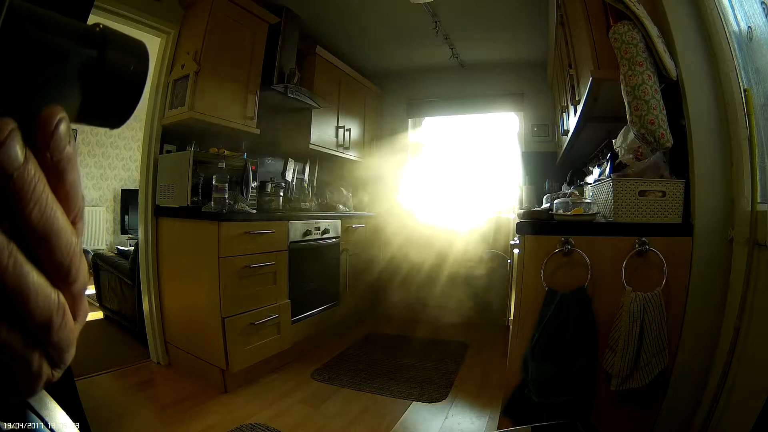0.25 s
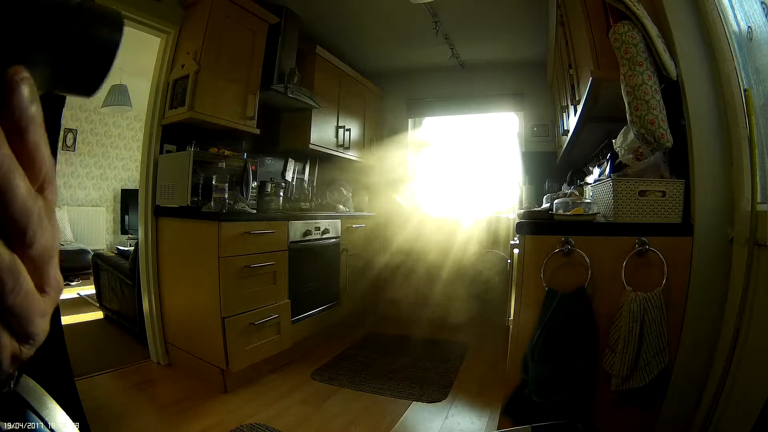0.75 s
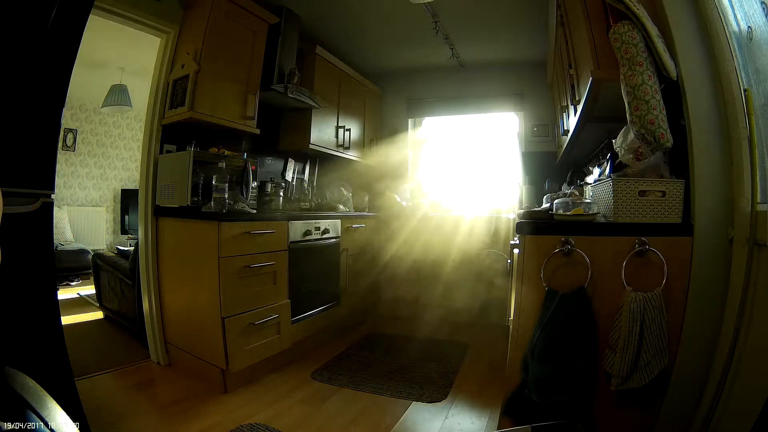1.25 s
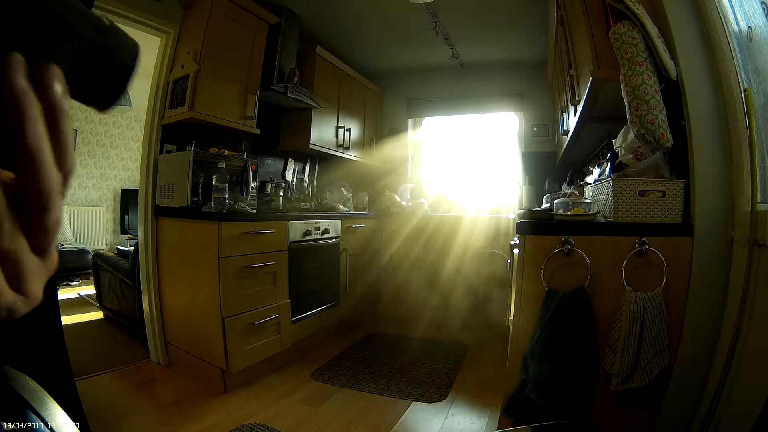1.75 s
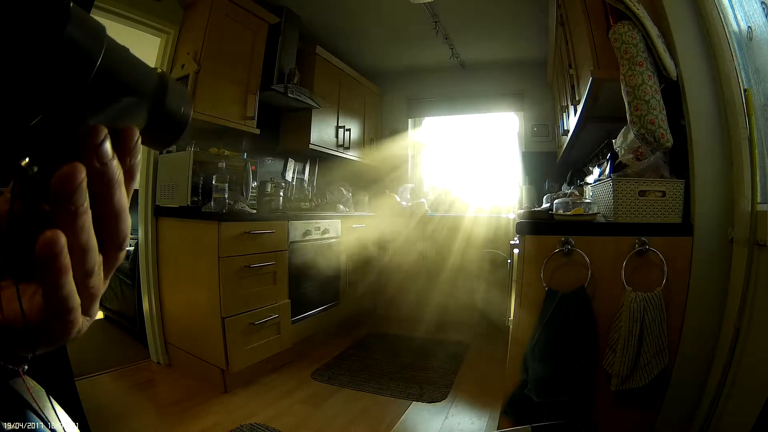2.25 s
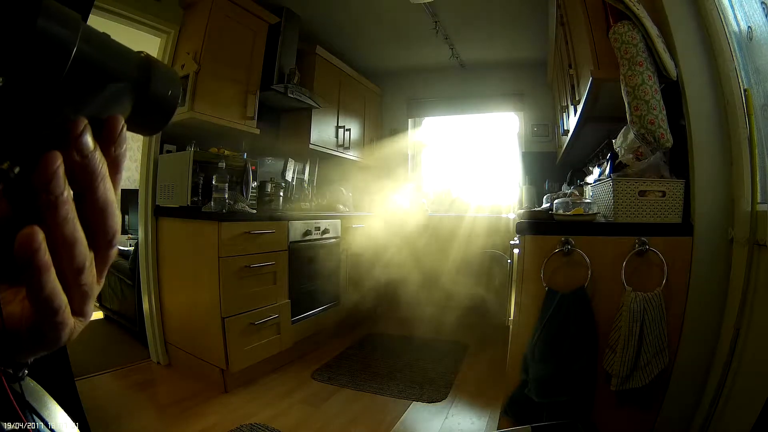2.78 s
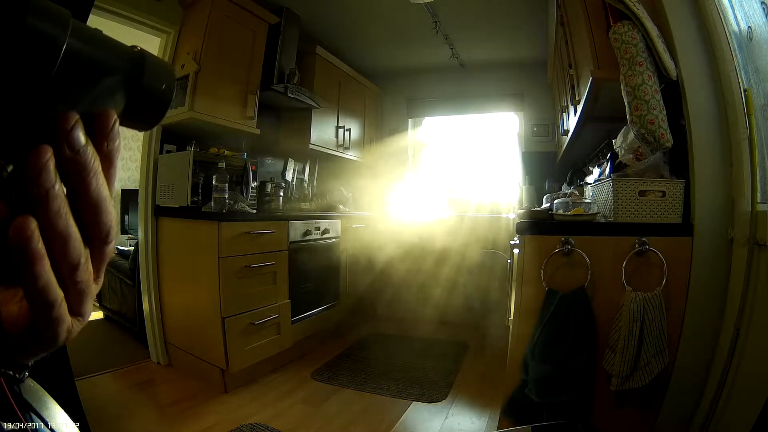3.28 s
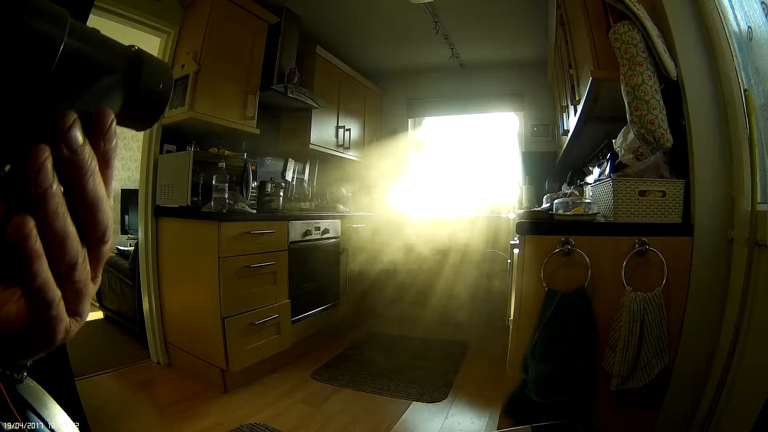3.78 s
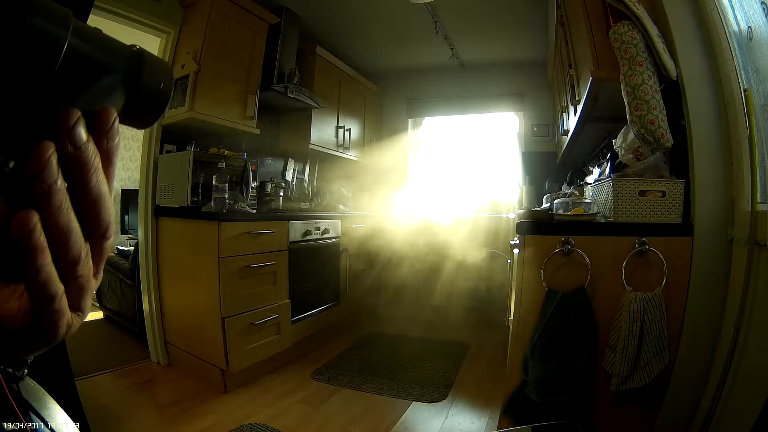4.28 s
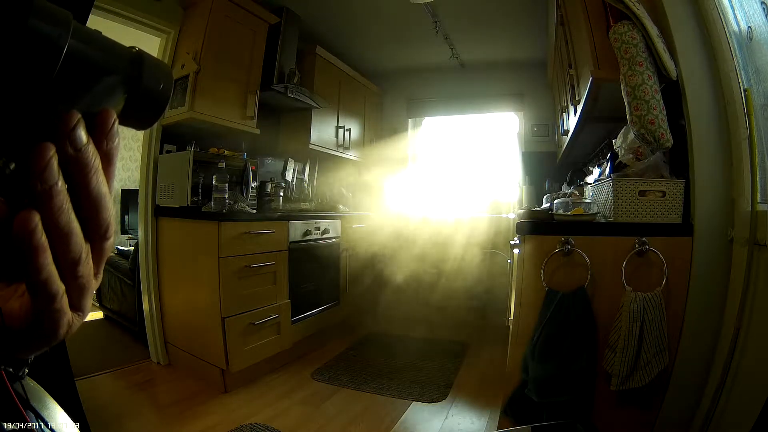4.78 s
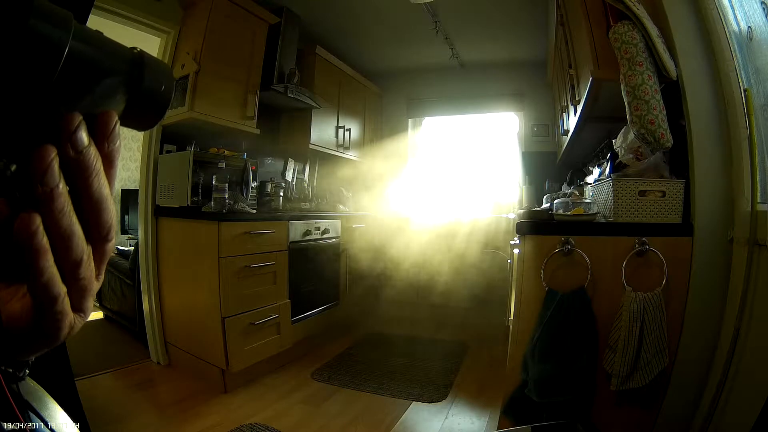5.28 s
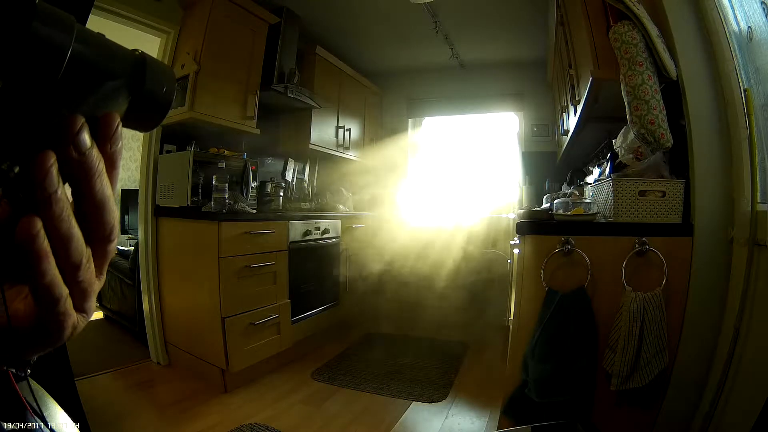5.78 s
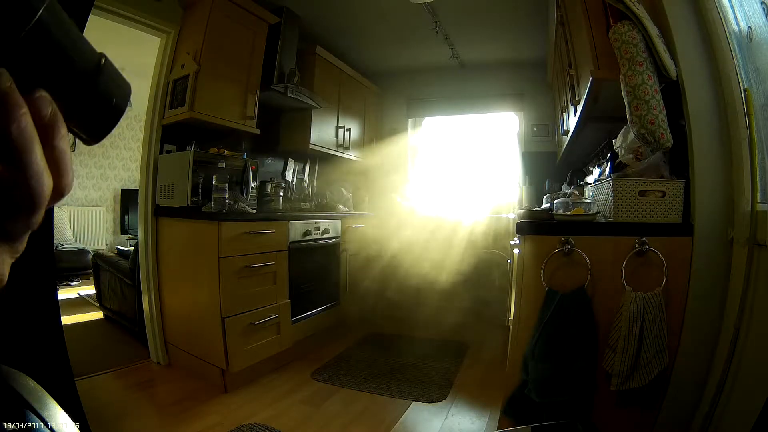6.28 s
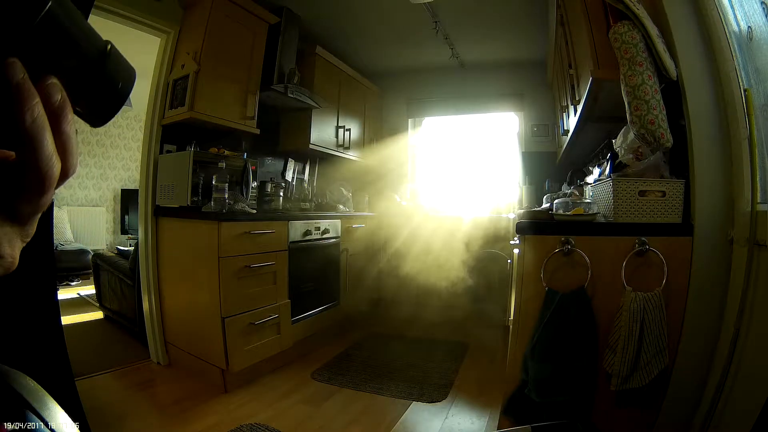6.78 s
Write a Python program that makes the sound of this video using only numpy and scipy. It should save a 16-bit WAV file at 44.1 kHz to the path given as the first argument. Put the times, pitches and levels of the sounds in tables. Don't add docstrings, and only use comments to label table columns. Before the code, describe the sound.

Close, steady hairdryer rush with a whirring motor tone, briefly dipping twice, then coasting down to near quiet, clicking, and surging back.

```python
import sys
import numpy as np
from scipy import signal
from scipy.fft import rfft, irfft, next_fast_len
from scipy.io import wavfile
from scipy.ndimage import uniform_filter1d, map_coordinates

SR = 44100
rng = np.random.default_rng(int(sys.argv[2]) if len(sys.argv) > 2 else 0)


def boost(x):
    u = np.asarray(x, float) / 20
    return 10 ** u


def put_to_file(sound):
    columns = np.atleast_2d(sound).T
    safe = np.clip(columns, -1, 1)
    whole_steps = np.round(safe * 32767)
    wavfile.write(sys.argv[1], SR, whole_steps.astype(np.int16))


N = 310464


def unit(x):
    return x / np.sqrt(np.mean(x ** 2) + 1e-20)


def along(points, hz):
    f, v = np.transpose(points)
    return np.interp(np.log(hz + 1), np.log(f + 1), v)


def curves(rows):
    s, *cols = np.transpose(rows)
    return [np.interp(np.arange(N) / SR, s, c) for c in cols]


def wobble(rate):
    knots = rng.standard_normal(int(N * rate / SR) + 4)
    return map_coordinates(knots, [np.arange(N) * rate / SR])


# (time [s], speed the motor pulls towards [Hz], 0 = off, spin-up time [s])
SWITCH = [
    (0, 291.3, .13),
    (1.35, 0, 0),
    (1.425, 275.9, .128),
    (3.62, 0, 0),
    (3.905, 291.6, .137),
    (5.29, 0, 0),
    (6.635, 240, .25),
    (6.8, 292, .25),
]


def shaft():
    creep_hz_per_s = .35
    braked_decay_s, free_decay_s, free_hz = .25, .35, 86
    out, hz = np.zeros(N), SWITCH[0][1]
    starts = [round(row[0] * SR) for row in SWITCH]
    for a, b, (_, top_hz, rise_s) in zip(starts, starts[1:] + [N], SWITCH):
        t = np.arange(b - a) / SR
        if top_hz:
            out[a:b] = top_hz + creep_hz_per_s * t - (top_hz - hz) * np.exp(-t / rise_s)
        else:
            braked_s = np.minimum(t, braked_decay_s * np.log(hz / free_hz))
            out[a:b] = hz * np.exp(-braked_s / braked_decay_s - (t - braked_s) / free_decay_s)
        hz = out[b - 1]
    return uniform_filter1d(out, size=700)


def powered():
    s, top_hz, _ = np.transpose(SWITCH)
    row = np.searchsorted(s, np.arange(N) / SR, "right") - 1
    return uniform_filter1d(1. * (top_hz[row] > 0), size=900)


# (time [s], level of the dryer's air and tones [dB], inlet facing the microphone [dB])
HAND = [(0, -1.5, -5), (.08, 0.1, 2), (.55, -1, -14), (.8, 1.2, -28), (1.3, 0.6, -45), (1.44, -1.3, 6),
        (1.58, 1.1, -1), (1.75, 1.5, 3.5), (1.95, 1.8, 2), (2.15, 0.7, 1), (2.9, 0.1, 0.5),
        (3.6, 0.84, 2.5), (4.0, 0.3, -2), (4.26, 3.5, 0), (4.6, 0.06, 3), (5.3, -0.44, 1), (6.8, 1.4, -1),
        (6.95, 2, -18)]


def by_speed(rows):
    speed_hz, *cols = np.transpose(rows)
    now = np.log(shaft())
    return np.array([np.interp(now, np.log(speed_hz), c) for c in cols]) + curves(HAND)[0]


# (time [s], share of the second aim [0-1])
TURN = [
    (0, 0.3),
    (1.2, 0),
    (1.9, 0.94),
    (7.04, 1),
]


def turned():
    return np.clip(curves(TURN)[0], 0, 1)


# (shaft [Hz], roar [dB], duct resonance [dB], hiss [dB], rumble [dB])
AIR_BY_SPEED = [(6, -70, -71, -65, -70), (21, -56, -61, -58, -56), (26.2, -49, -52, -54, -57),
                (46, -40.5, -44.5, -50, -55), (65, -42, -43.5, -48, -53), (90.6, -32.5, -36, -44, -48.5),
                (126, -27.5, -30.5, -37.5, -46), (164, -25.5, -24.5, -33.5, -44),
                (212, -23.5, -21.5, -28.5, -41), (297.4, -20.5, -16.5, -22, -38)]
# (roar [dB], duct resonance [dB], hiss [dB], rumble [dB])
FIRST_AIM_DB = (1.5, -1.5, -0.64, 6.5)


def flow():
    first = 1 - turned()
    levels_db = by_speed(AIR_BY_SPEED) + np.outer(FIRST_AIM_DB, first)
    levels_db[1] += 0.077 * first * curves(HAND)[1]
    return levels_db


# (frequency [Hz], width [Hz], lift [dB])
STANDING = [(608, 69, -1.5), (751.5, 30, 5), (1000, 17, 7), (1094, 49, 4), (1260, 26, 5.5),
            (1344, 13, 10.5), (1455, 47, 3), (1610, 35, -1), (1724, 21, 6.5), (1911, 17, 7.5),
            (2070, 14, 4), (2167, 15, 2), (4630, 82, 4.5), (5550, 140, 4), (7230, 110, 1.5)]


def rush(spectra, patchy_db, peaks=STANDING):
    z = signal.stft(rng.standard_normal(N + 512), nperseg=512)[2]
    field = uniform_filter1d(rng.standard_normal(z.shape), 5, 0)
    field = uniform_filter1d(field, 8, 1)
    noise = signal.istft(z * boost(patchy_db * unit(field)), nperseg=512)[1]
    m = next_fast_len(N + 8192)
    hz = np.fft.rfftfreq(m, 1 / SR)
    lift_db = sum(db / (1 + (2 * (hz - centre) / width) ** 2) for centre, width, db in peaks)
    lifted = rfft(noise, m) * boost(lift_db)
    return [unit(irfft(lifted * boost(along(s, hz)), m)[:N]) for s in spectra]


def aimed(spectra, patchy_db):
    first, second, coasting = rush(spectra, patchy_db)
    turn = turned()
    slow = np.clip((139 - shaft()) / 71.5, 0, 1)
    return (1 - slow) * ((1 - turn) * first + turn * second) + slow * coasting


# (frequency [Hz], density [dB per Hz])
ROAR = [
    [(210, -56), (350, -30), (371, -17.5), (474, -12.5), (610, 1.5), (764, -4.5), (895, -13), (1010, -5.5), (1120, 0.5), (1460, -5.5), (1700, -3), (2210, -23), (3740, -120)],
    [(210, -36), (350, -17), (386, -13.5), (487, -13), (556, -4.5), (665, -5), (744, -2.5), (889, -3.5), (1070, -1), (1550, -4), (1700, -10.5), (2210, -54), (3740, -120)],
    [(210, -39), (350, -9), (500, 0), (720, 7.5), (821, 1.5), (1140, 0), (1380, -3.5), (1700, -6), (2210, -42.5), (3740, -120)],
]
# (frequency [Hz], density [dB per Hz])
DUCT = [
    [(910, -26), (1550, 0), (1960, -0.5), (2350, -9.5), (2490, -10), (2670, -5.5), (2870, -11), (3190, -9), (3700, -43), (4810, -36), (8140, -120)],
    [(910, -63), (1550, -13), (1660, -9), (1880, -2), (1980, 0.5), (2320, -12.5), (2690, -10), (2900, -16), (3160, -14), (3700, -33), (4810, -56), (8140, -120)],
    [(910, -47), (1550, -19), (1810, -1), (2000, 2), (2270, -9), (2620, -8), (2900, -3), (3700, -30), (4810, -51), (8140, -120)],
]
# (frequency [Hz], density [dB per Hz])
HISS = [
    [(2000, -15), (3400, -2), (3780, -8.5), (4780, 0.5), (5250, -5), (5450, -2.5), (6380, -1), (7140, 3.5), (7800, -3), (8470, -1.5), (9970, -8), (11200, -14.5), (12400, -13), (13300, -21), (15300, -41)],
    [(2000, -20), (3400, -8), (3690, -6.5), (4350, -3.5), (4720, -0.5), (5090, -3.5), (5630, -3), (6420, -3.5), (6920, 3), (7190, 4.5), (7950, -3), (9370, -4.5), (10900, -15.5), (12300, -13), (15300, -37.5)],
    [(2000, -42), (3400, -12), (3880, -12), (4050, 1), (4300, -5), (4600, -11.5), (5800, -10), (6100, -9), (7060, -2), (9790, -15), (11700, -13), (12400, -16), (15300, -35)],
]
# (frequency [Hz], density [dB per Hz])
RUMBLE = [(15, -52), (25, -39), (92, -11.5), (220, -3.5), (274, -3), (325, -3.5), (450, 0), (580, -0.5),
          (990, -120)]


def air():
    roar_db, duct_db, hiss_db, rumble_db = flow()
    flutter = 0.35 * wobble(9) + 0.16 * wobble(40)
    roar = boost(roar_db + flutter + 0.12 * wobble(28)) * aimed(ROAR, patchy_db=0.9)
    duct = boost(duct_db + flutter + 0.47 * wobble(90)) * aimed(DUCT, patchy_db=0.03)
    hiss = boost(hiss_db + flutter + 0.15 * wobble(150)) * aimed(HISS, patchy_db=-1.36)
    rumble = boost(rumble_db - 2.5) * rush([RUMBLE], patchy_db=0.7)[0]
    return roar + duct + hiss + rumble


# (shaft [Hz], unbalance [dB], blade [dB], second blade [dB], third blade [dB])
TONES_BY_SPEED = [(22, -90, -88, -80, -75), (28.5, -83, -71, -54, -48), (42, -79, -57, -44, -62),
                  (60, -78, -41.5, -49, -65), (85, -78, -36.5, -48, -60), (112, -68, -41, -46, -58),
                  (150, -67, -47, -56, -54), (201, -60, -27, -58, -60), (243, -44.5, -27, -54, -54),
                  (264, -43.5, -28.5, -47, -34), (292, -42.5, -27.5, -44, -42.5)]
# (share of facing [dB per dB], ..)
BEAMING = (-0.06, 0.32, .3, 2.2)
# (level [dB], ..)
DRIVEN_DB = (0, 1.5, -27, .5)
# (shaft multiple, level under the hiss [dB])
BRUSHES = [(19, -31), (20, -31), (35, -29), (38, -31), (41, -31), (43, -31), (44, -32), (45, -30),
           (46, -32), (47, -32)]


def fan():
    shaft_hz, power = shaft(), powered()
    tones_db = by_speed(TONES_BY_SPEED) + np.outer(BEAMING, curves(HAND)[1]) + np.outer(DRIVEN_DB, power)
    angle = 2 * np.pi * np.cumsum(shaft_hz * (1 + 0.00034 * wobble(25.06))) / SR
    loading = .5 + shaft_hz / 580
    tones, whine = np.zeros(N), np.zeros(N)
    for k, db, shake_db in zip((1, 7, 14, 21), tones_db, (1.5, 2.8, 2.5, 1.5)):
        tones += np.sqrt(2) * boost(db + shake_db * loading * wobble(45)) * np.sin(k * angle)
    for k, db in BRUSHES:
        dull_db = np.maximum(k * shaft_hz - 12700, 0) / 70
        whine += boost(db + 1.4 * wobble(2.8) - dull_db) * np.sin(round(k) * angle + k * k)
    return tones + boost(flow()[2]) * power * whine


def motor_hum():
    t = np.arange(N) / SR
    near_db = np.interp(t, [0, 1.4, 2.2, 7], [-44.0, -45.0, -55.0, -48.0])
    level = powered() * (shaft() / 290) ** 2 * boost(near_db + 1.5 * wobble(11))
    return level * np.sin(2 * np.pi * 100 * t)


# (time [s], third mains harmonic [dB], fourth [dB])
FRIDGE = [(0, -57, -56), (5.1, -58.5, -59), (5.5, -45.5, -66), (5.8, -92, -56), (6.2, -70, -65),
          (6.4, -69, -74), (7.04, -48.5, -72)]


def far_hum():
    t = np.arange(N) / SR
    return sum(boost(db + 1.2 * wobble(8.3)) * np.sin(2 * np.pi * hz * t)
               for hz, db in zip((150, 198), curves(FRIDGE)))


# (frequency [Hz], density [dB per Hz])
QUIET = [(18, -25), (30, -2), (186, 0), (915, -24.5), (1160, -4), (1390, -15), (2960, -4), (3640, -18),
         (5250, -12), (6300, -10), (7180, 3.5), (9320, -30), (11800, -16.5), (14100, -28), (15300, -16)]
# (frequency [Hz], width [Hz], lift [dB])
PORT = [(11900, 400, 9), (4700, 500, 8), (3700, 400, 0)]


def idle_kitchen():
    return boost(-54.5) * rush([QUIET], patchy_db=.5, peaks=PORT)[0]


# (time [s], peak [dB], knock [dB], first ping [Hz], second ping [Hz])
CLICKS = [(3.909, -25, -10, 5600, 10200), (5.7498, -29.5, -5.5, 4840, 12800),
          (5.7977, -30.5, -3, 4870, 7500), (6.2118, -27, 0.5, 5000, 2050), (6.3144, -52, 7, 7500, 1100),
          (6.334, -44, 2, 5200, 1300), (6.3776, -32, -14, 5070, 10500), (6.386, -19.5, -24, 7860, 5460),
          (6.5964, -41, -1, 7280, 700), (6.6046, -27, -8.5, 4700, 9000), (6.6672, -37.5, 3, 5000, 1890),
          (6.7595, -21, -15, 5330, 6300), (6.3615, -48, 6, 7300, 1900), (6.452, -52, 2, 5000, 1100)]
# (frequency [Hz], level [dB])
CRACK = [(300, -27), (1500, -11), (2900, -1), (3700, -14), (5550, -5), (6300, -2), (7800, -1), (9000, -8),
         (10200, -10), (11500, -16), (13000, -16), (15500, -40)]
# (frequency [Hz], level [dB])
CASING = [(300, -22), (650, 0.5), (950, -7), (1180, -2), (1400, -12), (1700, -1), (2100, -0.5), (2900, -12),
          (3600, -28), (6000, -46)]


def clicks():
    out, t = np.zeros(N + SR), np.arange(SR // 8) / SR
    hz = np.fft.rfftfreq(len(t), 1 / SR)

    def burst(seed, colour):
        return unit(irfft(rfft(seed) * boost(along(colour, hz)), len(t)))

    def dying(t60_s):
        return boost(-60 * t / t60_s)

    seeds = rng.standard_normal((len(CLICKS), 2, len(t)))
    for (s, db, knock_db, ping_hz, other_hz), seed in zip(CLICKS, seeds):
        other_db = min(-7 * np.log2(other_hz / ping_hz) - 5.5, 7)
        pings = np.sin(2 * np.pi * ping_hz * t) + boost(other_db) * np.sin(2 * np.pi * other_hz * t)
        crack = burst(seed[0], CRACK) * (dying(0.0096) + 0.17 * dying(0.08))
        knock = burst(seed[1], CASING) * (dying(0.02) + 0.29 * dying(0.17))
        snap = 1.3 * pings * dying(.009) + 0.65 * crack + boost(knock_db - 1.0) * knock
        onset = 1 - np.exp(-t / 0.00039)
        out[round(s * SR):][:len(t)] += boost(db) * snap * onset
    return out[:N]


# (frequency [Hz], t60 [s])
WALLS = [(200, 0.49), (2000, 0.32), (10000, 0.18)]


def walls(x):
    hz, t, z = signal.stft(rng.standard_normal(SR // 2), SR, nperseg=256)
    decay = boost(-60 * t / along(WALLS, hz)[:, None])
    tail = signal.istft(z * decay, SR, nperseg=256)[1]
    return signal.fftconvolve(np.pad(x, (200, 0)), tail / np.linalg.norm(tail))[:N]


def scene():
    snaps = clicks()
    dryer = air() + fan() + motor_hum() + snaps
    kitchen = far_hum() + idle_kitchen() + boost(-15.0) * walls(snaps)
    mono = dryer + kitchen
    return np.array([mono, mono])


def low_pass(x):
    return signal.sosfilt(signal.butter(12, 15750, fs=SR, output="sos"), x)


def record(dry):
    bassless = signal.sosfilt(signal.butter(2, 40, "high", fs=SR, output="sos"), dry)
    held = np.clip(bassless, -.66, .66)
    held = signal.sosfiltfilt(signal.butter(12, 15800, fs=SR, output="sos"), held)
    return low_pass(held)


dry = scene()
out = record(dry)
put_to_file(out)
```